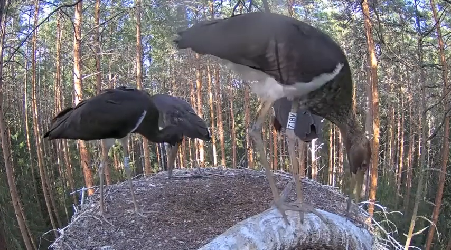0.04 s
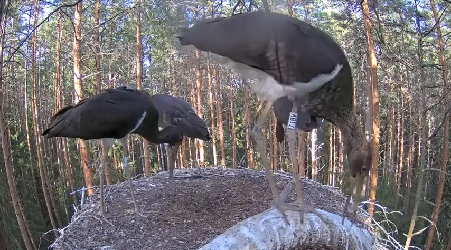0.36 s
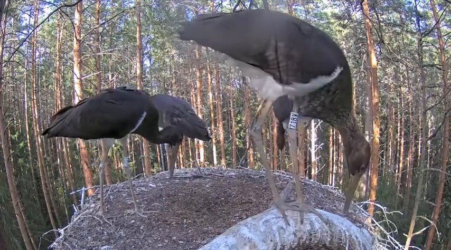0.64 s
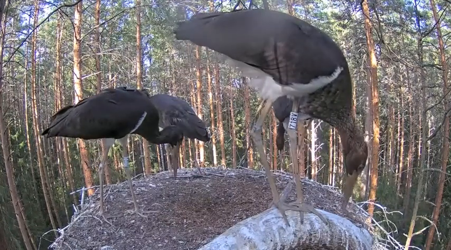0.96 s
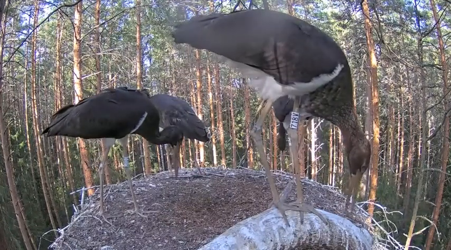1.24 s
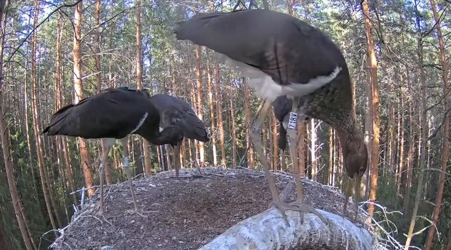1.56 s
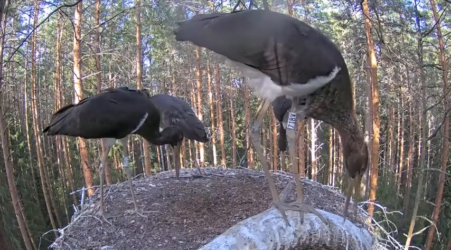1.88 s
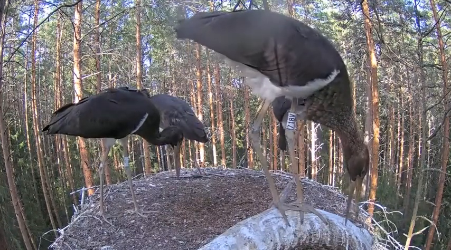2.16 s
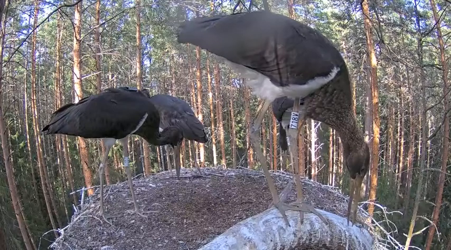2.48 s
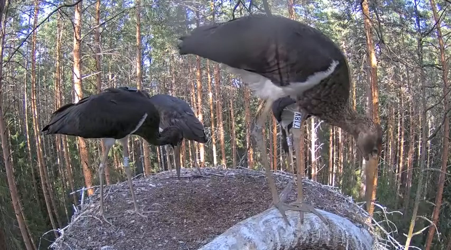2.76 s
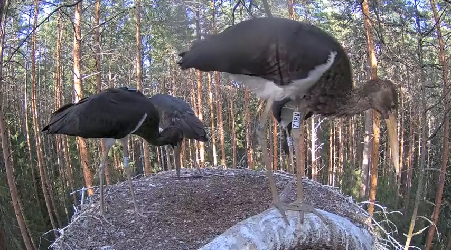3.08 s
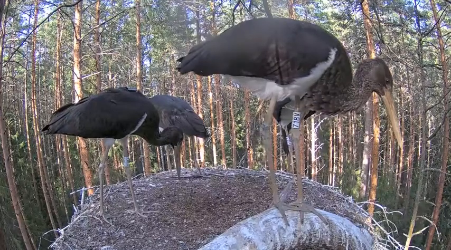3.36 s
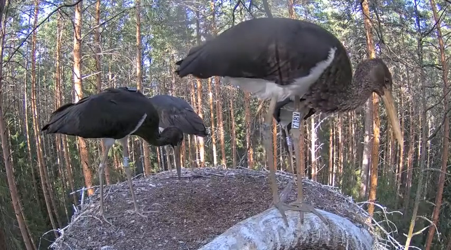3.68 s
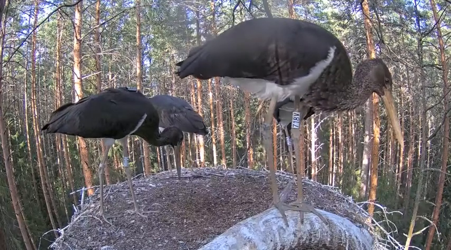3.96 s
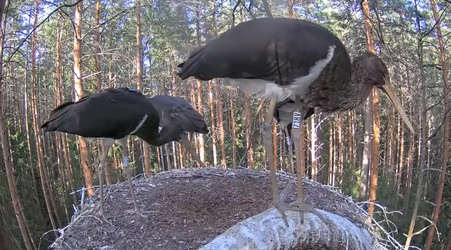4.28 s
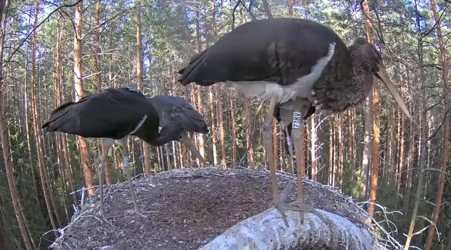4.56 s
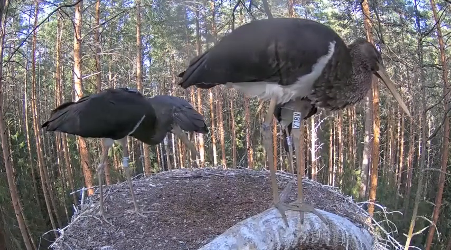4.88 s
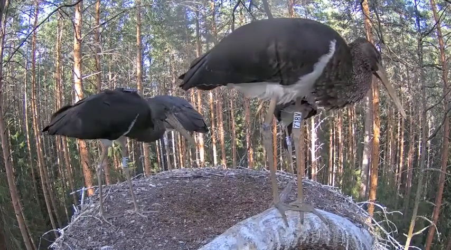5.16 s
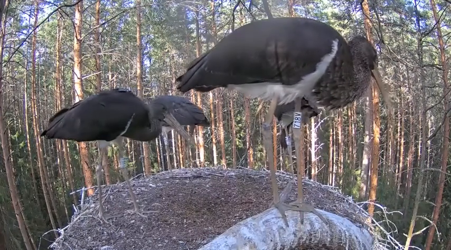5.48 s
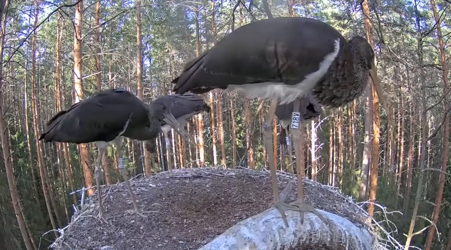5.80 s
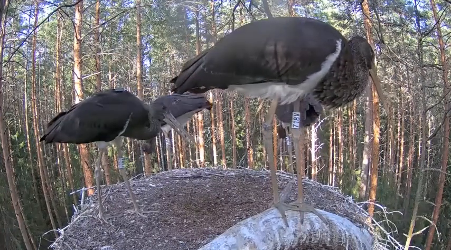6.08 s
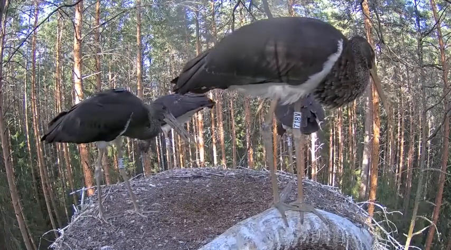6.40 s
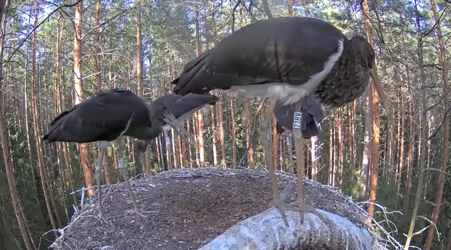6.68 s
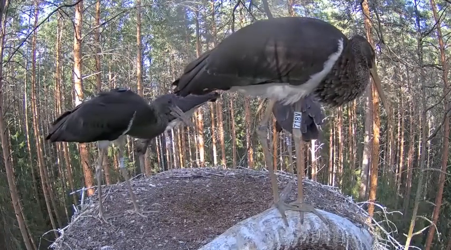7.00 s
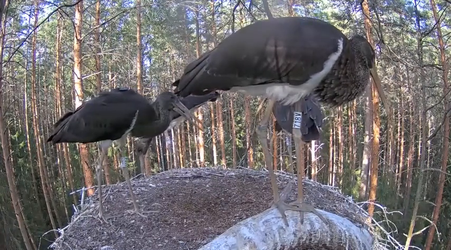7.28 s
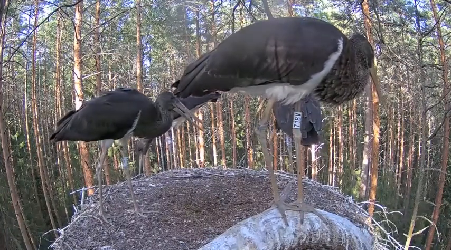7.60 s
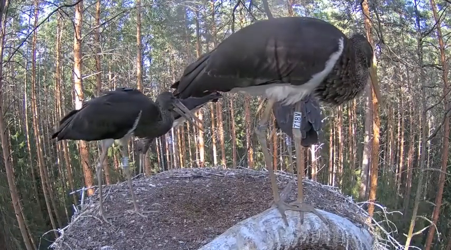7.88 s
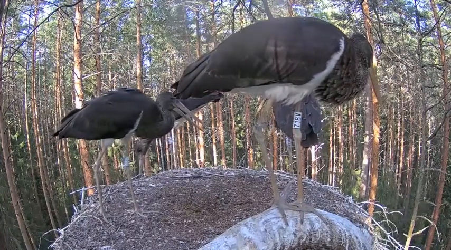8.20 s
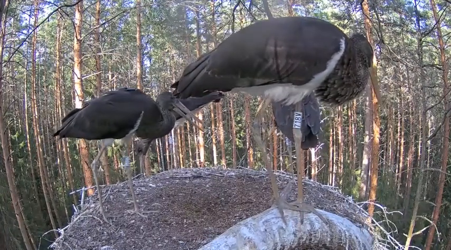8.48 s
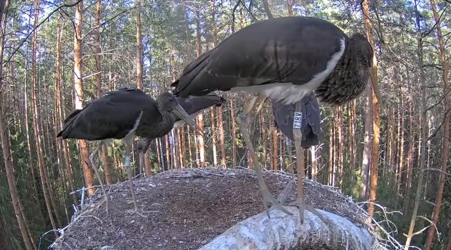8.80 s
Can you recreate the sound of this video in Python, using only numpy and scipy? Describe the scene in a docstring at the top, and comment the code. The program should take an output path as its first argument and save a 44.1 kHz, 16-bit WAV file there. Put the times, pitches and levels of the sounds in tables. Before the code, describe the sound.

A stork clatters its bill in quick runs of dry, hollow clacks, each with a short echo among the trees. The runs thin out into weaker taps and soft nibbling, then start again, turning to a lower knock with sharper ticks in the second half. Twigs tick faintly in the nest. A soft, steady forest rush and thin microphone hiss lie behind it all.

```python
"""A black stork claps its bill in runs of dry, hollow clacks, on a stick nest in a pine forest.
Each clack rings the mouth cavity, bounces off the nest and scatters among the trunks.
Between runs the bill nibbles softly. Twigs tick faintly under the birds and the nest bumps once.
Behind it all lie a soft, steady rush and the hiss of the microphone."""
import sys
import numpy as np
from scipy import signal
from scipy.fft import rfft, irfft, next_fast_len
from scipy.io import wavfile
from scipy.ndimage import uniform_filter1d, minimum_filter1d, map_coordinates

SR = 44100
rng = np.random.default_rng(int(sys.argv[2]) if len(sys.argv) > 2 else 0)


def store_pcm(level_fs):
    """Save levels as 16-bit WAV."""
    pcm = np.round(np.clip(level_fs, -1, 1) * 32767).astype(np.int16)
    wavfile.write(sys.argv[1], SR, np.atleast_2d(pcm).T)


N = 399105

# tone of the steady background rush: pitch_hz, relative_db
RUSH_TONE = [(25, -4.5), (70, -13.5), (300, -20.5), (410, -13), (540, -20), (1080, -5.5), (2000, -29),
             (4500, -32.5)]
# how loud that rush is over time: time_s, level_db
RUSH_LEVEL = [(0, -44.5), (3.2, -44), (5.5, -46.5)]
# tone of the microphone hiss: pitch_hz, relative_db
HISS_TONE = [(2000, -37), (4400, -6.5), (8800, 0), (15800, -8.5)]
# how long the forest echo takes to fade by 60 dB: pitch_hz, fade_s
ECHO_FADE = [(300, 0.98), (1100, 0.57), (3000, 0.45), (9000, 0.7)]
# each clack of the bill: start_s, strength_db
CLACKS = [(0.059, -2), (0.128, 3.5), (0.197, 1), (0.264, -4), (0.331, -2), (0.453, -8.5), (0.52, -5.5),
          (0.603, -1), (0.663, -12), (0.673, -8.5), (0.737, -14.5), (0.764, 5), (0.925, -18.5),
          (0.946, 1.5), (0.967, -9.5), (1.026, 1), (1.04, -15), (1.071, -8), (1.108, -9), (1.125, 5.5),
          (1.178, 0.5), (1.232, 5), (1.267, -10), (1.29, -4), (1.331, -12.5), (1.382, 0.5), (1.436, 0.5),
          (1.488, 4.5), (1.544, 1), (1.673, -14.5), (1.717, -6.5), (1.791, -2), (1.871, -19.5),
          (1.954, -12), (2.007, -5.5), (2.064, -17.5), (2.124, -16.5), (2.172, -5), (2.239, -14),
          (2.327, -5), (2.432, -12), (2.505, -20), (2.754, -19.5), (2.835, -21), (2.912, -26), (3.287, -14),
          (3.334, -8), (3.38, -2), (3.435, 0), (3.484, 0), (3.541, -2.5), (3.6, 0), (3.654, 0),
          (3.712, -0.5), (3.77, 2), (3.826, -1), (3.889, -0.5), (3.953, -1.5), (4.017, -1), (4.077, 0.5),
          (4.137, -1), (4.268, -18.5), (4.318, -10), (4.381, -8), (4.449, -14), (4.592, 7), (4.678, -1.5),
          (4.753, 0), (4.828, -0.5), (4.891, -2), (4.955, 0.5), (5.033, 0.5), (5.123, -4.5), (5.209, -1),
          (5.317, -13), (5.378, -19), (5.701, -18.5), (5.77, 0), (5.831, 2.5), (5.892, 1), (5.951, 4),
          (6.011, 4), (6.076, 2.5), (6.143, 4.5), (6.209, 2.5), (6.359, -1.5), (6.417, -8), (6.481, -3),
          (6.549, -1.5), (6.612, -2), (6.676, -2.5), (6.741, -3.5), (6.807, -3.5), (6.914, -3.5),
          (6.988, -3), (7.074, -2), (7.163, -1.5), (7.244, -8.5), (7.338, -1.5), (7.551, -20), (7.734, -15),
          (7.821, -22), (7.964, -18), (8.06, -14), (8.121, -2), (8.212, -3), (8.286, -3), (8.361, -3.5),
          (8.439, -25)]
# stretches of soft nibbling between runs: start_s, end_s
NIBBLING = [(2.55, 3.25), (7.55, 7.9)]
# overall tone of a clack as heard through the microphone, strongest near 1 kHz,
# with the neck stretched out or the bill tucked to the breast: pitch_hz, stretched_db, tucked_db
CLACK_TONE = [(144, -40, -43), (283, -25, -44.5), (411, -14, -25.5), (690, -6.5, -8.5), (762, -9.5, -9),
              (1016, -3, -2.5), (1481, -4, -7), (1596, -15, -15.5), (1775, -7, -9), (2200, -16.5, -17),
              (2750, -13.5, -15), (3270, -20, -15), (4900, -26.5, -23), (7260, -38, -50),
              (8630, -34.5, -39), (15200, -48.5, -64.5)]
# the note of the mouth cavity moves as the bird shifts its throat: time_s, pitch_hz
MOUTH_PITCH = [(0.6, 1320), (0.7, 915), (0.765, 1290), (0.94, 1055), (1.24, 990), (1.29, 1430), (1.8, 1350),
               (1.97, 990), (2.25, 1280), (2.7, 1020), (3.49, 920), (3.55, 1474), (4.38, 1376), (4.59, 950),
               (4.75, 1347), (5.21, 1274), (5.35, 940), (6.2, 1156)]
# how the bill's halves meet, from flat and hollow to sharp at the tips:
# time_s, low_knock_db, hard_edge_db, tip_tick_db
CONTACT = [(0.13, -0.5, 7, 7), (0.33, -5, 3.5, 3), (0.66, -6.5, -4.5, -9), (0.765, 0.5, 1, 2.5),
           (0.95, -1.5, -3.5, -2.5), (1.03, -4.5, -1.5, -3.5), (1.5, -2.5, 2, -2.5),
           (1.79, -3.5, -0.5, -10), (2.1, -1, -5, -17), (2.55, -9, -0.5, 5), (3.4, -3.5, -1, -8.5),
           (3.77, -3, -1.5, -7), (4.0, -5, -7, -15), (4.59, -1.5, -2.5, -11), (4.68, -5.5, -9.5, -14),
           (4.93, -8, -4, -3), (5.3, -9, -7.5, -14), (5.77, 5, -25.5, -7), (6.05, 4, -13, 1.5),
           (6.36, 4, -10.5, 3), (6.55, 2, -4, 8.5), (6.68, 1.5, 0, 20.5), (6.81, -0.5, 2, 20.5),
           (6.92, 1, 2, 12), (7.3, 5, -3, 11), (7.6, -12, -7.5, -2), (7.97, -16, -8.5, 8),
           (8.15, 2.5, 2.5, 15.5)]
# each pose of the head sets the bounce off the nest and the scatter among the trunks:
# start_s, bounce_delay_s, bounce_share, scatter_db, scatter_brightness_db
HEAD_POSES = [(0, 0.0019, 0.26, 1, -4.5), (.9, 0.0029, 0.16, 4, 7.5), (1.6, 0.0022, 0.11, 2.5, 7.5),
              (3.31, .00286, 0.2, 7, 5), (3.57, 0.0014, 0.14, 5, 9), (4.52, 0.00354, 0.12, -0.5, 12.5),
              (5.55, 0.0037, 0.14, 2.5, 6.5), (6.3, 0.0019, 0.42, 7, -3.5)]
# what the bill sends sideways into the forest: pitch_hz, gain_db
SIDEWAYS_TONE = [(600, -3.5), (1080, 5.5), (1450, 0), (3000, -4.5), (4200, -5)]


def amp(db):
    """Turn decibels into a gain."""
    return 10 ** (np.asarray(db) / 20)


def at_pitch(points, hz):
    """Read (pitch_hz, value) points at the given pitches, on a log scale."""
    pitches, values = np.transpose(points)
    return np.interp(np.log(hz + 1), np.log(pitches), values)


def at_time(table, time_s):
    """Read a table's value columns at a time, gliding between rows."""
    times, *columns = np.transpose(table)
    return [np.interp(time_s, times, column) for column in columns]


def add(track, start_s, sound):
    """Mix a sound into a track."""
    start = max(round(start_s * SR), 0)
    part = track[start:start + len(sound)]
    part += sound[:len(part)]


def struck(gain):
    """The ring of a struck object with this gain at each pitch: a sudden start, then a fade."""
    cepstrum = irfft(np.log(np.maximum(gain, 1e-6)))
    half = len(cepstrum) // 2
    # folding the second half onto the first moves the energy to the start
    cepstrum[1:half] *= 2
    cepstrum[half + 1:] = 0
    return irfft(np.exp(rfft(cepstrum)))


def filtered(sound, gain_at):
    """Scale each pitch in a sound by gain_at(hz)."""
    size = next_fast_len(N + SR // 2)
    hz = np.fft.rfftfreq(size, 1 / SR)
    return irfft(rfft(sound, size) * gain_at(hz), size)[..., :N]


def noise(tone):
    """Steady noise with the given tone and an average (rms) size of 1."""
    sound = filtered(rng.standard_normal(N), lambda hz: amp(at_pitch(tone, hz)))
    return sound / sound.std()


def microphone_hiss(level_db):
    """The microphone's own thin, steady hiss."""
    return amp(level_db) * noise(HISS_TONE)


def background_rush():
    """A steady background rush with a low rumble and a hollow hump near 1.1 kHz."""
    level_db, = at_time(RUSH_LEVEL, np.arange(N) / SR)
    return amp(level_db) * noise(RUSH_TONE)


def twigs(per_second=7, weakest_db=-8, range_db=8):
    """Faint dull taps of sticks shifting under the birds."""
    taps = np.zeros(N)
    for place, size in rng.random((int(per_second * N / SR), 2)):
        taps[int(place * N)] = amp(weakest_db + range_db * size)
    hz = np.fft.rfftfreq(1024, 1 / SR)
    stick_db = at_pitch([(150, -37), (1150, 12), (2000, -19), (10000, -49)], hz)
    return signal.fftconvolve(taps, struck(amp(stick_db)))[:N]


def nest_bump(start_s=3.335, gain_db=-23, fade_s=0.0014):
    """One low, dull push through the nest."""
    out = np.zeros(N)
    age = np.arange(SR // 20) / SR / fade_s
    add(out, start_s, amp(gain_db) * age * (2 - age) * np.exp(-age))
    return out


def forest_echo(near_db=-19, near_fade_s=0.039, far_db=-26, echoes_per_s=1400):
    """Sharp little echoes from sticks and branches, then a longer tail among the trunks."""
    t = np.arange(SR // 2) / SR
    sticks = rng.random(len(t)) < echoes_per_s / SR
    near = sticks * rng.standard_normal(len(t)) * amp(-60 * t / near_fade_s) * (t > .002)
    hz, times, bands = signal.stft(rng.standard_normal(len(t)), SR, nperseg=256)
    fade = amp(-60 * times / at_pitch(ECHO_FADE, hz)[:, None])
    far = signal.istft(bands * fade, SR)[1][:len(t)] * (t > .015)
    return amp(near_db) * near / np.linalg.norm(near) + amp(far_db) * far / np.linalg.norm(far)


def nibbles(per_second=8, strength_db=-27, spread_db=3):
    """The faintest touches of the bill, as rows of start_s, strength_db."""
    return [(start + (end - start) * place, strength_db + spread_db * (2 * size - 1))
            for start, end in NIBBLING
            for place, size in rng.random((int(per_second * (end - start)), 2))]


def grating(hz, blow_db, fade_s=0.0017):
    """Gain per pitch as the bill's edges scrape: a hard blow snaps cleanly, a soft one grates."""
    age = np.arange(2048) / SR / fade_s
    grit = rng.standard_normal(len(age)) * np.sqrt(age) * np.exp(-age)
    treble = 1 - 1 / (1 + (hz / 2500) ** 4)
    share = treble * np.interp(blow_db, [10, 24], [.85, .35])
    return np.sqrt(1 - share ** 2) + share * rfft(grit / np.linalg.norm(grit))


def contact_db(hz, time_s, blow_db, hard_blow_db=34.5):
    """Where and how squarely the bill's halves meet sets the mix of knock, edge and tick."""
    knock_db, edge_db, tick_db = at_time(CONTACT, time_s)
    # a gentle blow stays in contact longer: more knock, less edge
    softness_db = max(hard_blow_db - blow_db, 0)
    knock_db += 0.21 * softness_db
    edge_db -= 0.24 * softness_db
    tone = [(650, knock_db), (950, 0.0047), (1550, 0), (2300, edge_db), (5500, edge_db), (8000, tick_db)]
    return at_pitch(tone, hz)


def mouth_ring(hz, time_s, boost_db=8.5, width_hz=110):
    """The air in the mouth boosts one note, which makes the clack hollow."""
    pitch_hz, = at_time(MOUTH_PITCH, time_s)
    return np.sqrt(1 + amp(boost_db) ** 2 / (1 + ((hz - pitch_hz) / width_hz) ** 2))


def clack_tone_db(hz, time_s, tuck_s=5.5, vary_db=3.1):
    """A clack's overall tone through the microphone; its high notes differ at every blow."""
    tone = [(pitch, tucked if time_s > tuck_s else stretched) for pitch, stretched, tucked in CLACK_TONE]
    ripple = map_coordinates(rng.standard_normal(SR // 200), [hz / 330])  # a new value every 330 Hz
    high_notes = np.interp(hz, [1400, 2000], [0, 1])
    return at_pitch(tone, hz) + vary_db * high_notes * ripple


def bill_clapping(base_blow_db=27.5, closing_s=0.0015, uneven_s=0.00025, lead_s=0.002, dull_hz=3000):
    """The bill snaps shut: each blow rings the mouth, then echoes off the nest and the trees."""
    out = np.zeros(N)
    hz = np.fft.rfftfreq(2048, 1 / SR)
    bright_band = np.exp(-((hz - 2700) / 560) ** 2)
    delay = lambda seconds: np.exp(-2j * np.pi * hz * seconds)
    to_sound = lambda spectrum: irfft(spectrum * delay(lead_s))[:SR // 40]
    for touch_s, strength_db in [*CLACKS, *nibbles()]:
        time_s = touch_s + closing_s + uneven_s * rng.standard_normal()  # moment of full contact
        blow_db = base_blow_db + strength_db
        mouth = mouth_ring(hz, time_s)
        tone = amp(blow_db + clack_tone_db(hz, time_s) + contact_db(hz, time_s, blow_db))
        clack = rfft(struck(mouth * tone)) * grating(hz, blow_db)
        pose = [row for row in HEAD_POSES if row[0] <= time_s][-1]
        _, bounce_s, bounce_share, scatter_db, brightness_db = pose
        # the nest throws the clack back duller; the bill swings a little between blows
        swing = 1 + .02 * rng.standard_normal()
        bounce = bounce_share * delay(bounce_s * swing) / (1 + (hz / dull_hz) ** 2)
        add(out, time_s - lead_s, to_sound(clack * (1 + bounce)))
        # the mouth aims its ring forward, so less of it reaches the trunks
        sideways_db = at_pitch(SIDEWAYS_TONE, hz) + scatter_db + brightness_db * bright_band
        sideways = clack * np.sqrt(mouth.max() / mouth) * amp(sideways_db)
        add(out, time_s - lead_s, signal.fftconvolve(to_sound(sideways), forest_echo()))
    return out


def scene():
    """All reaches one microphone; left is slightly quieter and differs from right by a little hiss."""
    mono = bill_clapping() + twigs() + nest_bump() + background_rush() + microphone_hiss(level_db=-54)
    side = microphone_hiss(level_db=-72)
    left = amp(-.5) * (mono + side)
    return np.array([left, mono - side])


def record(dry, ceiling=0.87, hold_s=0.0009, top_hz=15900):
    """A fast limiter holds the loud clacks at one height; everything above top_hz is cut."""
    size = int(hold_s * SR)
    needed_gain = np.minimum(1, ceiling / (np.abs(dry).max(axis=0) + 1e-9))
    smooth_gain = uniform_filter1d(minimum_filter1d(needed_gain, 2 * size + 1), size)
    return filtered(dry * smooth_gain, lambda hz: hz < top_hz)


dry = scene()
out = record(dry)
store_pcm(out)
```